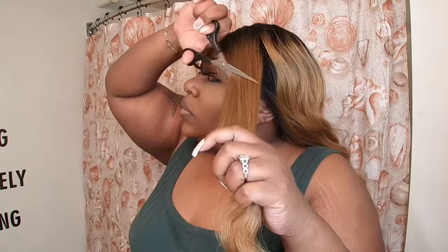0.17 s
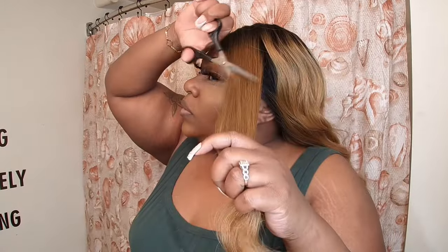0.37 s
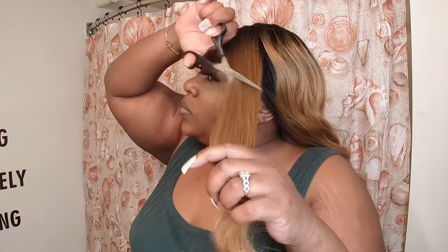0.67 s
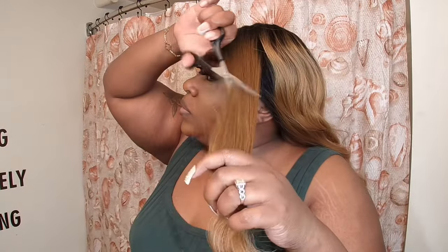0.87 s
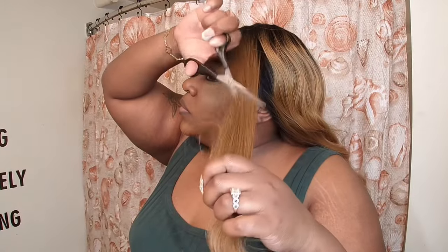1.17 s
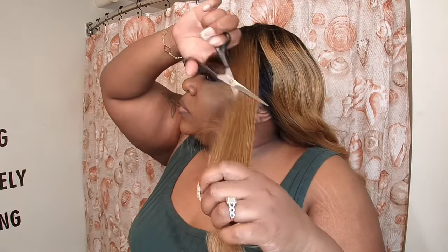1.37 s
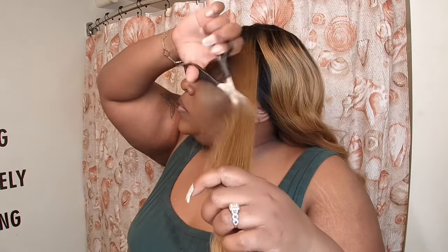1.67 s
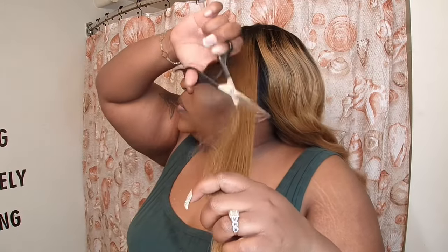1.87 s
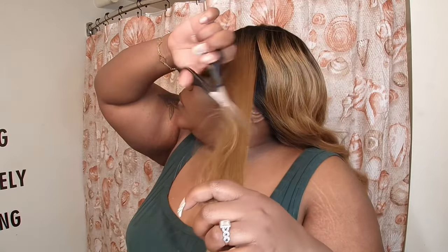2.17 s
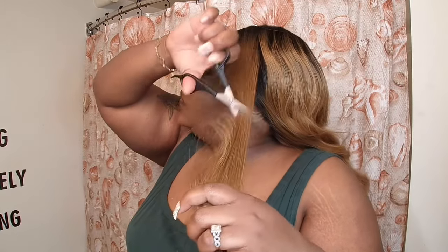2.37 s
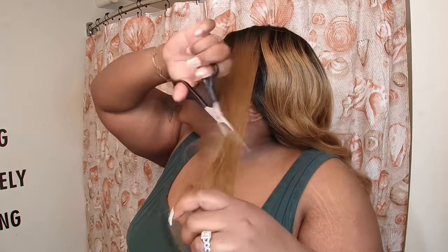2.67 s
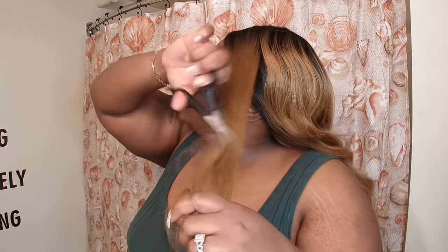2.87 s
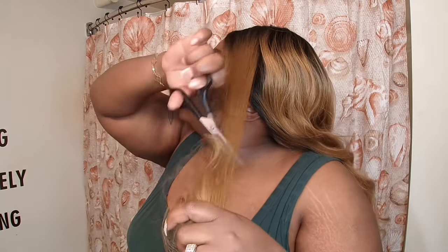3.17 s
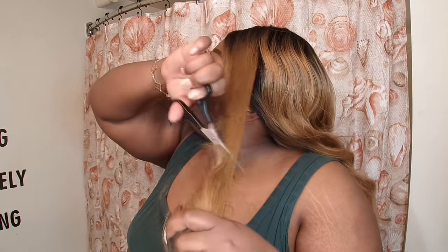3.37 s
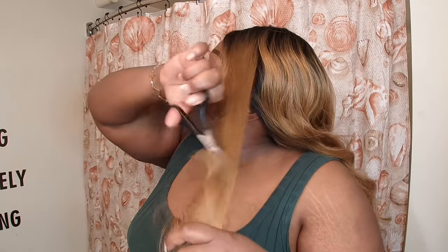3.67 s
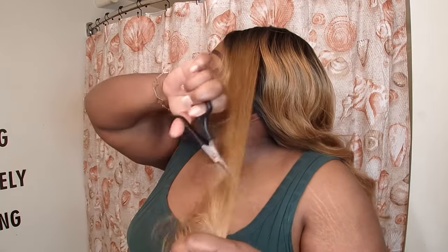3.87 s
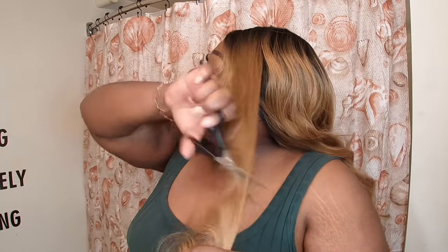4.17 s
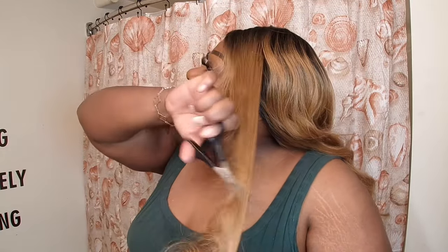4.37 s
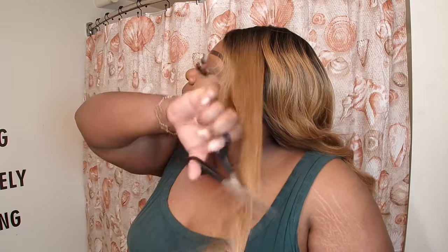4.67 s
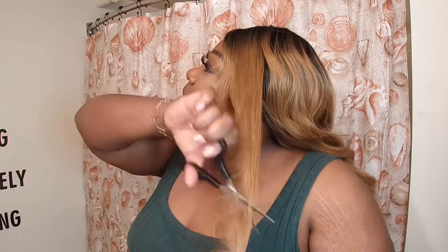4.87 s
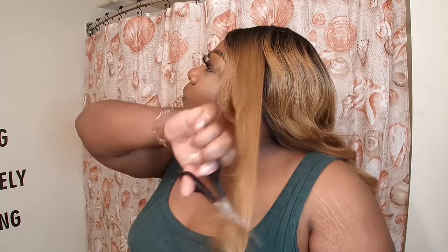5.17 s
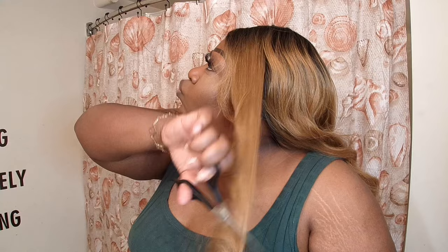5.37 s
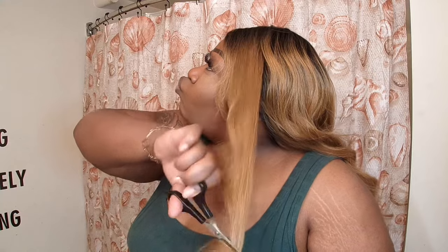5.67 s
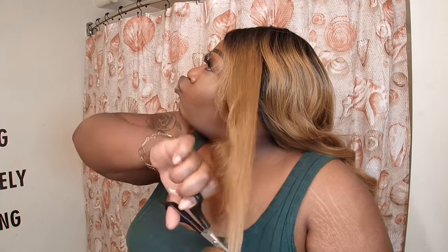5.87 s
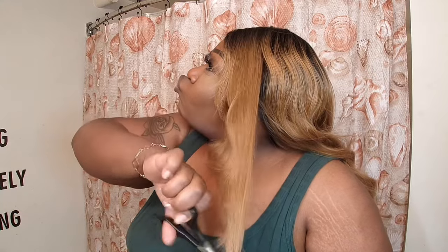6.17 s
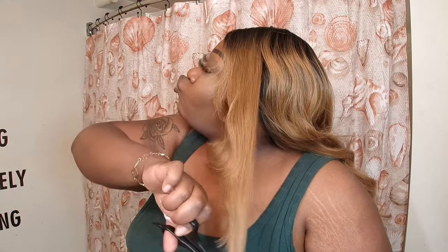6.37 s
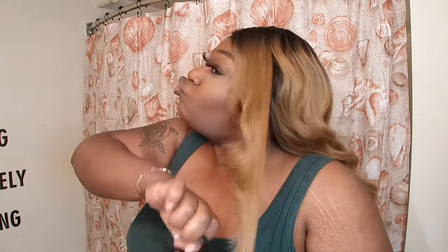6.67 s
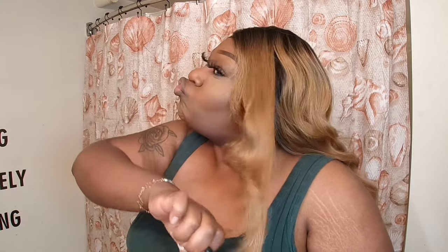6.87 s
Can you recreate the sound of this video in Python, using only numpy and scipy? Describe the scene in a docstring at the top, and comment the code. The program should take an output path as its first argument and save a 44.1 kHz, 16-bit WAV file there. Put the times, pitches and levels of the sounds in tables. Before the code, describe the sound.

Scissors slide through hair in quick, even, bright swishes, then bite with louder rasps and small squeaks in a humming bathroom.

```python
"""Scissors sliding through hair

Scissors slide down a taut lock of synthetic hair about four times a second in a small, hard bathroom.
Fibres slip over the edges in soft, bright swishes that grow as the blades take more hair. Near the ends
the blades bite through the thick of the lock: the handles knock, snapping fibres rasp and stick-slip
friction squeaks. Mains hum, a low drone, air and a few dull thuds lie underneath."""
import sys
import numpy as np
from scipy import signal
from scipy.fft import rfft, irfft, next_fast_len
from scipy.io import wavfile

SR = 44100
rng = np.random.default_rng(int(sys.argv[2]) if len(sys.argv) > 2 else 0)


def wav_record(signal):
    """Record a signal, one row per channel, as 16-bit PCM in the file named by sys.argv[1]."""
    frames = np.transpose(np.atleast_2d(signal))
    bounded = np.clip(frames, -1, 1)
    # unit amplitude maps onto the largest positive 16-bit level
    quanta = np.round(bounded * 32767).astype(np.int16)
    wavfile.write(sys.argv[1], SR, quanta)


N = 308848
TIME = np.arange(N) / SR

# Mains hum and machine drone. Each row: frequency in Hz, rms level in dB.
HUM_TONES = [(27.0, -51), (60.0, -51.5), (81, -68.5), (180.0, -60.5), (300.0, -68.5)]
# Thuds in the building. Each row: centre in seconds, level in dB, half length in seconds, frequency in Hz.
BUILDING_THUDS = [(0.36, -47.5, 0.075, 80), (2.883, -45, 0.054, 79), (4.94, -60, 0.15, 243)]
# Room air and hiss. Each row: frequency in Hz, relative spectral density in dB.
AIR_SPECTRUM = [(20, -1), (45, -2.5), (85, 0), (140, -7), (250, -11.5), (500, -15), (1000, -20),
                (2000, -26), (4000, -30), (9000, -31), (15500, -32.5)]
# Modes of the handles. Each row: frequency in Hz, level in dB, time to fall 60 dB in seconds.
HANDLE_MODES = [(319, -49, 0.15), (368, -44, 0.17), (480, -46, 0.13), (653, -42, 0.078), (1090, -44, .07),
                (2050, -42, .05), (2630, -60, 0.28)]
# The lock dragging on the blades. Each row: start and length in seconds, relative level in dB,
# sag in dB per second, first and last frequency in Hz.
DRAG_EVENTS = [(5.895, 0.0137, -39.5, 6, 1850, 1460), (5.916, 0.122, -53.5, 30, 1400, 1280),
               (6.307, 0.014, -42, 0, 1600, 1410), (6.337, .185, -44.5, 21, 1220, 799),
               (6.66, 0.091, -50, 20, 1480, 1360)]
# The scrunch of a drag. Each row: frequency in Hz, relative spectral density in dB.
DRAG_SPECTRUM = [(200, -18), (350, -14), (550, -4), (800, 1.5), (1100, -0.5), (1450, 0), (2100, -4),
                 (2900, -7.5), (4500, -26)]
# Squeaks of the edge. Each row: start and length in seconds, level in dB, first and last pitch in Hz,
# gain of the overtones in dB.
SQUEAK_EVENTS = [(5.866, .045, -51.5, 1600, 1790, -11), (5.921, 0.031, -45, 1400, 1318, -15),
                 (5.997, 0.027, -56, 1335, 1313, -9), (6.297, 0.0087, -47, 2190, 2126, -1),
                 (6.328, .025, -44, 2190, 2130, 2), (6.517, .055, -49.5, 2220, 1416, -1.5),
                 (6.666, 0.0176, -44, 1976, 1806, -6.5), (6.686, 0.037, -40, 1410, 1316, -17),
                 (6.724, 0.051, -41, 1650, 1802, -6), (6.773, .025, -52.5, 1834, 1684, 3.5)]
# Harmonics two to five of a squeak. Each entry: relative level in dB.
OVERTONES_DB = [-1.5, 2, 3.5, -18]
# Bites into the lock. Each row: start and length in seconds, relative level in dB, attack in seconds,
# sag in dB per second.
BITE_EVENTS = [(5.861, 0.014, -42, 0.0055, 200), (5.895, 0.05, -34, .01, 140), (5.988, 0.034, -51, .02, 0),
               (6.3, 0.029, -42, .003, 0), (6.325, 0.09, -25, 0.016, 90), (6.486, 0.038, -44.5, 0.014, 0),
               (6.523, 0.048, -28.5, 0.018, 134), (6.582, 0.09, -36.5, 0.016, -8),
               (6.716, .055, -40.5, .008, 28), (6.777, 0.048, -39, 0.0072, 23)]
# Fibres shearing. Each row: frequency in Hz, relative spectral density in dB.
RASP_SPECTRUM = [(300, -38), (1000, -21), (2300, -17), (3000, -19), (4000, -14), (5300, -7.5), (6500, -0.5),
                 (8400, 0.5), (9700, -3), (10600, -11), (13000, -23), (15500, -32)]
# Blade modes in a bite. Each row: frequency and bandwidth in Hz, relative level in dB.
BITE_MODES = [(2040, 180, -20), (2750, 130, -20.5), (3204, 75, -19.5), (4370, 210, -8.5), (5260, 80, -12.5),
              (5430, 42, -8.5), (6400, 47, -6.5), (6550, 88, -9), (7645, 39, -13), (7840, 45, -15),
              (8200, 41, -12), (9900, 50, -12)]
# Strokes along the hair. Each row: centre in seconds, relative level in dB.
STROKE_EVENTS = [(0.212, -63.5), (0.486, -62.5), (0.74, -62), (0.97, -57.5), (1.216, -56), (1.458, -54),
                 (1.692, -52), (1.931, -51.5), (2.176, -51), (2.413, -48.5), (2.648, -51), (2.871, -49.5),
                 (3.108, -49.5), (3.349, -48.5), (3.584, -49), (3.813, -47), (4.045, -47), (4.275, -49),
                 (4.505, -46.5), (4.735, -47), (4.967, -48.5), (5.19, -47), (5.42, -49), (5.65, -48.5),
                 (5.875, -44), (6.086, -47), (6.3, -49), (6.952, -55.5)]
# Strokes get brisker near the ends. Each row: time in seconds, half length of a stroke in seconds.
STROKE_HALF_LENGTHS = [(0.2, 0.037), (5.0, 0.039), (6.3, 0.024)]
# Fibres sliding over the edge. Each row: frequency in Hz, relative spectral density in dB.
SWISH_SPECTRUM = [(300, -22), (900, -19), (1800, -17), (3800, -18), (5400, -18), (6400, -11.5),
                  (7400, -8.5), (8400, -3.5), (9400, -3.5), (10100, -12), (11000, -17.5), (12300, -22),
                  (15500, -32)]
# Blade modes in a stroke. Each row: frequency and bandwidth in Hz, then relative levels in dB
# at the top, the middle and the ends of the lock.
STROKE_MODES = [(1294, 190, -10, -20, -22), (2305, 360, -19, -8, -18), (2566, 360, -20, -11, -10),
                (6740, 350, -4.5, -10, -19), (7930, 220, -9, -15, -9), (8490, 230, -12, -25, -4.5),
                (9200, 340, -12, -23, -3)]
# The scissors pass the top, the middle and the ends of the lock. Each entry: time in seconds.
TRAVEL_TIMES_S = [1.54, 3.7, 5.1]


def from_db(db):
    """Amplitude grows tenfold with every 20 dB."""
    return 10 ** (np.asarray(db) / 20)


def rms_one(x):
    """Dividing by the rms gives unit power."""
    return x / np.sqrt(np.mean(x ** 2) + 1e-20)


def coloured(x, spectrum):
    """Filtering multiplies the spectrum of an excitation by a gain curve; rms 1."""
    hz, level_db = np.transpose(spectrum)
    size = next_fast_len(N)
    bin_hz = np.maximum(np.arange(size // 2 + 1) * SR / size, 1)
    gain = from_db(np.interp(np.log(bin_hz), np.log(hz), level_db))
    return rms_one(irfft(rfft(x, size) * gain, size)[:N])


def resonate(x, hz, width_hz):
    """A damped mode responds most near its natural frequency; rms 1."""
    radius = np.exp(-np.pi * width_hz / SR)
    feedback = [1, -2 * radius * np.cos(2 * np.pi * hz / SR), radius ** 2]
    return rms_one(signal.lfilter([1, 0, -1], feedback, x))


def wander(per_s):
    """Random values joined by straight lines make low-pass noise; rms 1."""
    knots = np.arange(0, TIME[-1] + 1, 1 / per_s)
    return rms_one(np.interp(TIME, knots, rng.standard_normal(len(knots))))


def fibre_clicks(per_s, spread_db):
    """Shot noise: single fibres give independent impulses of uneven size; rms 1."""
    sizes = from_db(spread_db * np.minimum(rng.exponential(1, N), 4))
    signs = rng.choice([-1, 1], N)
    return rms_one(sizes * signs * (rng.random(N) < per_s / SR))


def swell(centre_s, half_s, squareness=1.9):
    """A bell-shaped envelope falls to 1/e at half_s either side of its centre."""
    distance = np.abs(TIME - centre_s) / half_s
    return np.exp(-distance ** squareness) * (distance < 4)


def push(start_s, length_s, attack_s, sag_db_per_s, release_db_per_s):
    """Pressure builds linearly, drifts exponentially while held, then decays on release."""
    t = np.maximum(TIME - start_s, 0)
    fall_db = sag_db_per_s * np.minimum(t, length_s) + release_db_per_s * np.maximum(t - length_s, 0)
    return np.minimum(t / attack_s, 1) * from_db(-np.minimum(fall_db, 150))


def glide(start_s, length_s, first_hz, last_hz):
    """Frequency relaxes exponentially: fast at first, then settling."""
    progress = np.clip((TIME - start_s) / length_s, 0, 1)
    relaxation = 0.591  # time constant as a share of the length
    return first_hz + (last_hz - first_hz) * np.expm1(-progress / relaxation) / np.expm1(-1 / relaxation)


def background(air_db=-55):
    """Superposition: steady tones of hum and drone, low tone bursts for thuds, and broadband air."""
    hum = sum(from_db(db) * np.sin(2 * np.pi * (hz * TIME + rng.random())) for hz, db in HUM_TONES)
    thuds = sum(from_db(db) * swell(centre_s, half_s) * np.sin(2 * np.pi * hz * TIME)
                for centre_s, db, half_s, hz in BUILDING_THUDS)
    air = from_db(air_db) * coloured(rng.standard_normal(N), AIR_SPECTRUM)
    return np.sqrt(2) * (hum + thuds) + air


def bathroom(x, wet_db, gap_s, t60_s):
    """Reverberation: reflections from close, hard walls merge into an exponentially decaying tail."""
    t = TIME[:SR // 2]
    tail = rng.standard_normal(len(t)) * from_db(-60 * t / t60_s) * (t > gap_s)
    reflections = signal.fftconvolve(x, tail / np.linalg.norm(tail))[:N]
    wet = from_db(wet_db)
    return (x + wet * reflections) / np.sqrt(1 + wet ** 2)


def handle_knock(start_s):
    """Free vibration: the handles knock as the blades catch, and the hand damps their modes."""
    t = np.maximum(TIME - start_s, 0)
    return sum(from_db(db - 60 * np.minimum(t / t60_s, 3)) * np.sin(2 * np.pi * hz * t)
               for hz, db, t60_s in HANDLE_MODES)


def drags():
    """Friction noise: the bundle catches and slips on the blades, its resonance sinking as it gives way."""
    scrunch = coloured(fibre_clicks(per_s=1600, spread_db=-0.5), DRAG_SPECTRUM)
    in_phase, quadrature = wander(per_s=380), wander(per_s=380)
    out = np.zeros(N)
    for start_s, length_s, db, sag, first_hz, last_hz in DRAG_EVENTS:
        phase = 2 * np.pi * np.cumsum(glide(start_s, length_s, first_hz, last_hz)) / SR
        # a narrow band of noise around the gliding frequency
        resonance = rms_one(in_phase * np.cos(phase) + quadrature * np.sin(phase))
        pull = from_db(db) * push(start_s, length_s, attack_s=0.0079, sag_db_per_s=sag, release_db_per_s=424)
        out += pull * (from_db(-2.0) * scrunch + from_db(-6.0) * resonance)
    return out


def squeaks(jitter=0.02, rough_db=4.0):
    """Stick-slip oscillation of the edge on the fibres; uneven cycles smear the upper harmonics."""
    uneven = 1 + jitter * wander(per_s=1200)
    grip = from_db(rough_db * wander(per_s=400))
    out = np.zeros(N)
    for start_s, length_s, db, first_hz, last_hz, overtone_db in SQUEAK_EVENTS:
        phase = 2 * np.pi * np.cumsum(glide(start_s, length_s, first_hz, last_hz) * uneven) / SR
        overtones = sum(from_db(level) * np.sin(k * phase) for k, level in enumerate(OVERTONES_DB, 2))
        pressure = push(start_s, length_s, attack_s=0.0044, sag_db_per_s=44, release_db_per_s=802)
        out += from_db(db) * pressure * (np.sin(phase) + from_db(overtone_db) * overtones)
    return grip * out


def bites():
    """Impulsive excitation: fibres snap in clumps, and the harder the bite, the more the steel rings."""
    force = sum(from_db(db) * push(start_s, length_s, attack_s, sag, release_db_per_s=422)
                for start_s, length_s, db, attack_s, sag in BITE_EVENTS)
    snaps = fibre_clicks(per_s=6400, spread_db=2.5) * from_db(0.79 * wander(per_s=400))
    rings = sum((-1) ** k * from_db(db) * resonate(snaps, hz, width_hz)
                for k, (hz, width_hz, db) in enumerate(BITE_MODES))
    hardness = np.sqrt(force / force.max())
    return from_db(-2.0) * force * (coloured(snaps, RASP_SPECTRUM) + hardness * rings)


def strokes(grip_db=1.0, flicker_db=1.2):
    """Sliding friction: fibres swish over the edge and drive blade modes whose balance shifts on the way."""
    speed = np.zeros(N)
    for centre_s, db in STROKE_EVENTS:
        half_s = np.interp(centre_s, *np.transpose(STROKE_HALF_LENGTHS))
        speed += from_db(db) * swell(centre_s, half_s, squareness=2.67)
    swish = coloured(fibre_clicks(per_s=6000, spread_db=2.0), SWISH_SPECTRUM)
    catches = fibre_clicks(per_s=3000, spread_db=2.5)
    rings = np.zeros(N)
    for k, (hz, width_hz, *levels_db) in enumerate(STROKE_MODES):
        # the grip shifts a little from stroke to stroke, changing the level of each mode
        level_db = np.interp(TIME, TRAVEL_TIMES_S, levels_db) + grip_db * wander(per_s=5)
        rings += (-1) ** k * from_db(level_db) * resonate(catches, hz, width_hz)
    flicker = from_db(flicker_db * wander(per_s=120))
    return from_db(-4.5) * speed * flicker * (swish + rings)


def scene():
    """The sounds of the scissors reverberate in the room and add to the background."""
    scissors = strokes() + bites() + drags() + handle_knock(start_s=5.903) + squeaks()
    return (bathroom(scissors, wet_db=-4.5, gap_s=0.0027, t60_s=0.18) + background())[None]


def record(dry, cutoff_hz=15800):
    """An elliptic low-pass filter cuts the highest treble steeply."""
    return signal.sosfilt(signal.ellip(12, .1, 80, cutoff_hz, fs=SR, output="sos"), dry)


dry = scene()
out = record(dry)
wav_record(out)
```